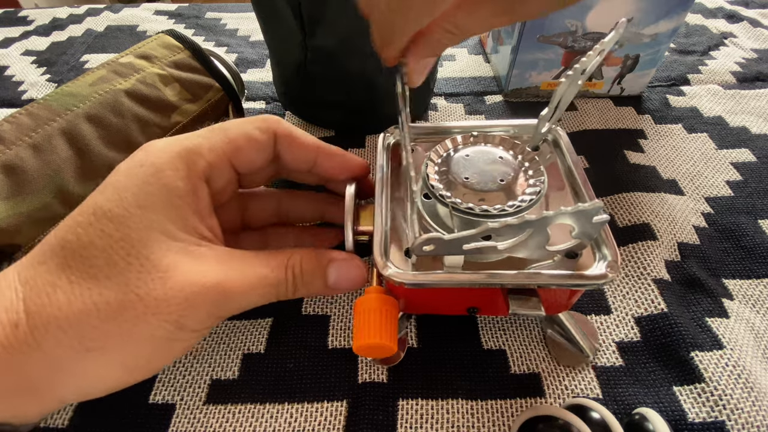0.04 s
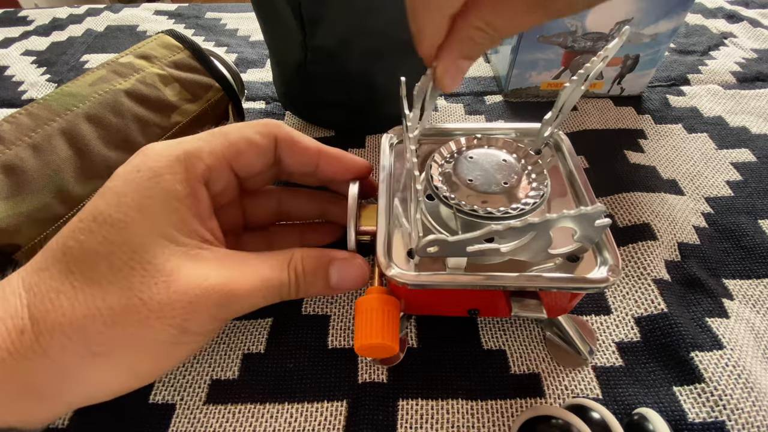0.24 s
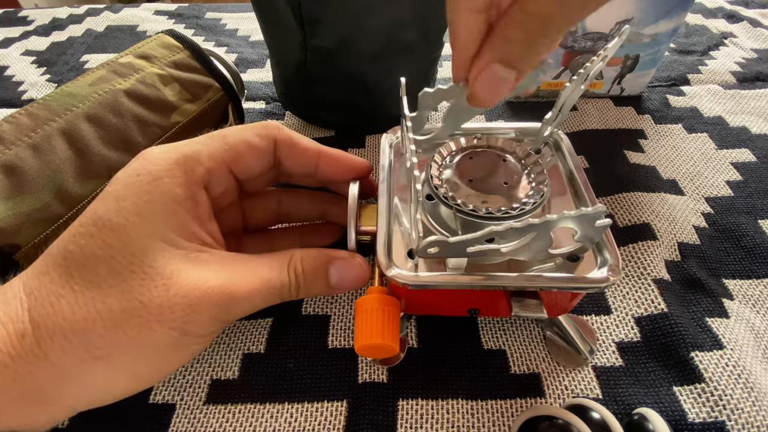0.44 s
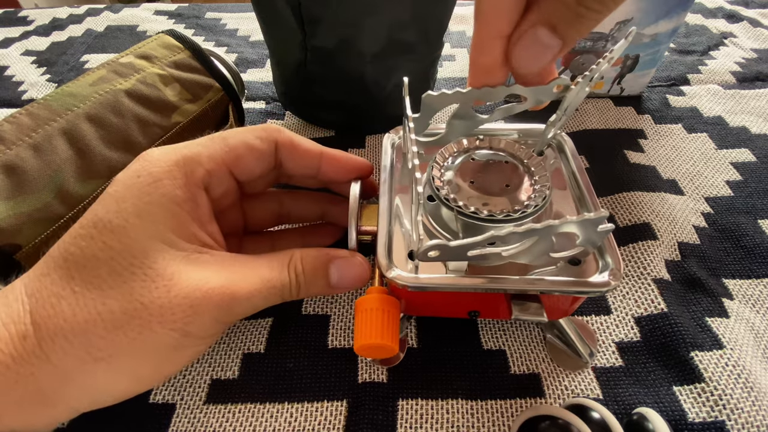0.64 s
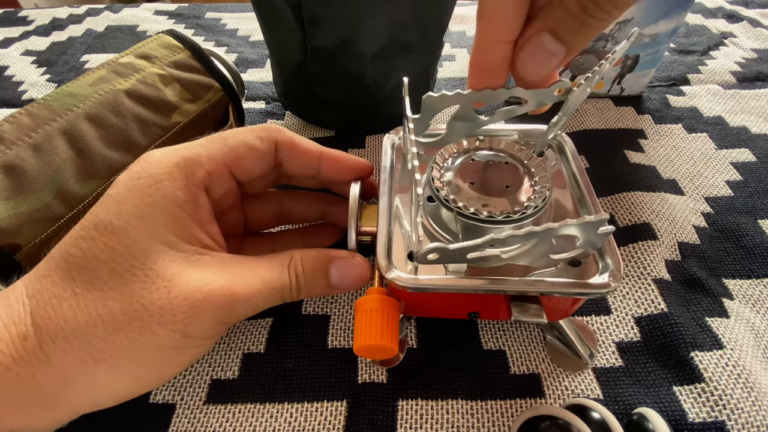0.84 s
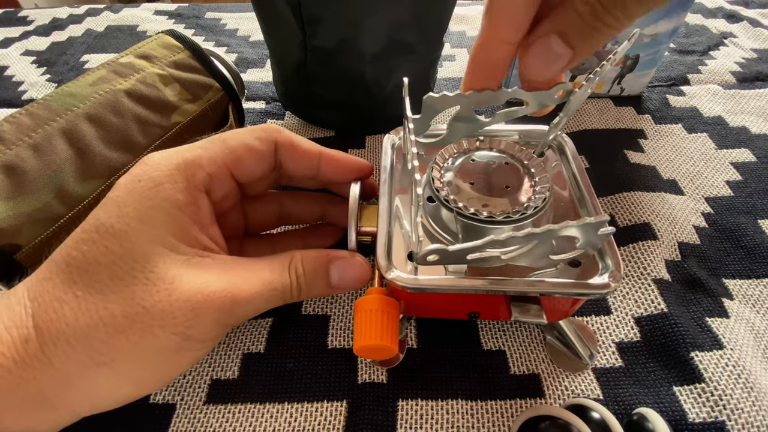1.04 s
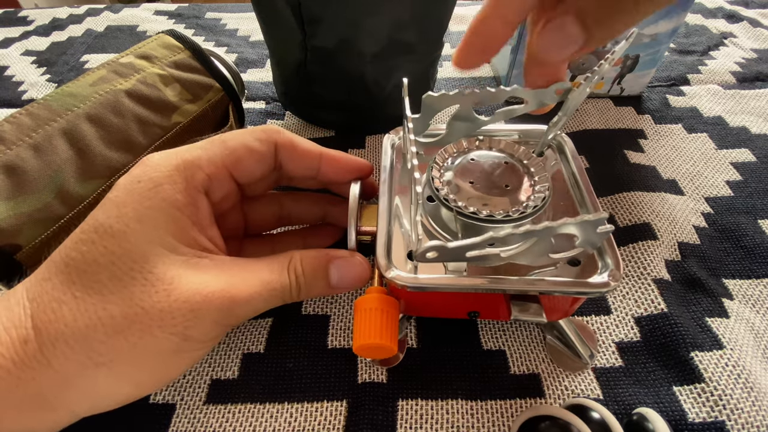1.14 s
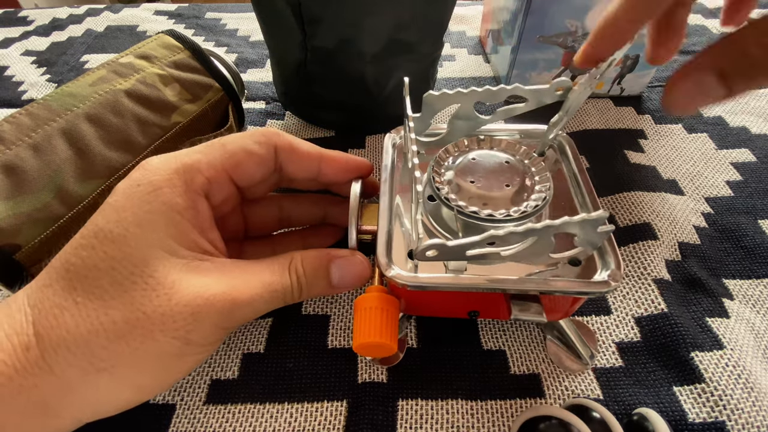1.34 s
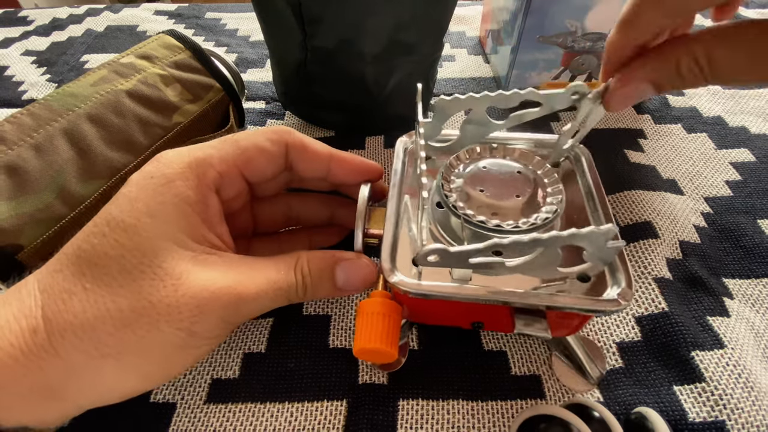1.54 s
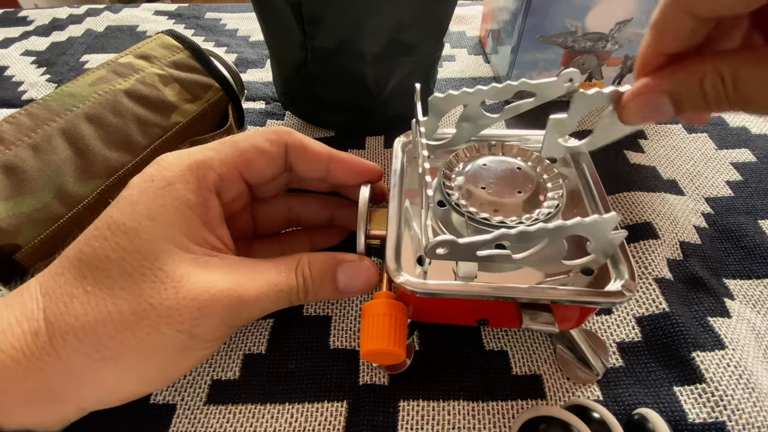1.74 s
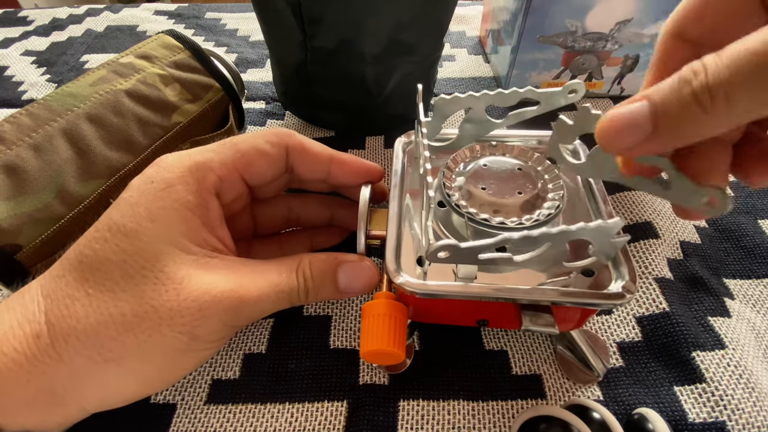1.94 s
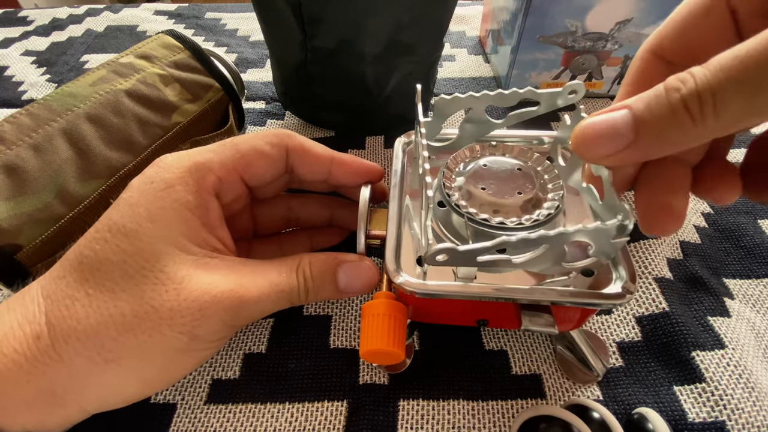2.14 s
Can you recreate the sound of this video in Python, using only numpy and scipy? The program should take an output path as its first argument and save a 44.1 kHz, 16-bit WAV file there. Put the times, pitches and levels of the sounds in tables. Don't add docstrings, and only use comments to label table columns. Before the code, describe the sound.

Thin steel clatter of a small stove's pan supports folded by hand. A faint scrape and chirp open; hard clacks with bouncing clinks strike at 0.21-0.25 and 0.31-0.33 seconds, the hollow tray ringing briefly. A light tick at 0.5, near quiet, then a tick at 1.3, soft scrapes, tiny ticks and squeaks from 1.5, dull knocks near 1.9, and a bright clink at 2.1. Close, indoors, low ventilation rumble.

```python
import sys
import numpy as np
from scipy import signal
from scipy.fft import rfft, irfft, next_fast_len
from scipy.io import wavfile
from scipy.ndimage import uniform_filter1d, map_coordinates

SR = 44100
rng = np.random.default_rng(int(sys.argv[2]) if len(sys.argv) > 2 else 0)


def gain_from_decibels(decibels):
    exponent = np.asarray(decibels, float) / 20
    return 10 ** exponent


def pcm_store(signal):
    levels = np.round(np.clip(np.atleast_2d(signal), -1, 1) * 32767)
    wavfile.write(sys.argv[1], SR, levels.astype(np.int16).T)


N = 97020

# centre in Hz, width in Hz, level in dB.
SOFT_PUSH = [(1363, 916, 0)]


def unit(x):
    return x / np.sqrt(np.mean(x ** 2) + 1e-20)


def along(points, hz):
    f, v = np.transpose(points)
    return np.interp(np.log(hz + 1), np.log(f + 1), v)


def filtered(x, response):
    m = next_fast_len(N + SR)
    return irfft(rfft(x, m) * response(np.fft.rfftfreq(m, 1 / SR)), m)[..., :N]


def scaled(response):
    return lambda f: response(f) / np.abs(irfft(response(f))).max()


def resonance(f, centre, width):
    return 1j * f * width / (centre * centre - f * f + 1j * f * width)


def resonant(peaks, flip=-1):
    def response(f):
        return sum(flip ** k * gain_from_decibels(db) * resonance(f, c, w) for k, (c, w, db) in enumerate(peaks))
    return scaled(response)


def causal(points):
    def response(f):
        cepstrum = irfft(np.log(gain_from_decibels(along(points, f)) + 1e-4))
        cepstrum[1:len(f) - 1] *= 2
        cepstrum[len(f):] = 0
        return np.exp(rfft(cepstrum))
    return scaled(response)


def ringing(modes):
    peaks = []
    for hz, db, t60 in modes:
        t60 = min(t60, 2)
        peaks.append((hz, np.log(1000) / np.pi / t60, db + 20 * np.log10(t60)))
    return resonant(peaks)


def wobble(rate):
    return map_coordinates(rng.standard_normal(N // 100), [np.arange(N) * rate / SR])


def span(t, start, length, edge):
    return np.clip(np.minimum(t - start, start + length + edge - t) / edge, 0, 1)


def contacts():
    # start in seconds, knock on the tray in dB, clink of the arm in dB, crack in dB.
    landings = [(.010, -36, -45, -40.5), (.020, -40, -52, -43.5), (.2148, -12, -9, -11),
                (.2160, -8, -14.5, -40), (.2176, -10.5, -16.5, -26), (.2290, -22, -36, -45),
                (.2445, -19, -9.5, -15), (.2456, -21, -20, -23), (.2470, -12.5, -16.5, -25),
                (.3050, -7, -9.5, -8), (.3064, -13.5, -13.5, -22), (.3084, -8, -12.5, -35),
                (.3105, -11, -13, -35), (.3198, -9.5, -10.5, -10), (.3238, -8, -5.5, -21),
                (.3258, -16, -18, -32), (.3290, -12, -29, -50), (.3385, -31, -39, -50),
                (.3425, -33, -49, -53), (.5057, -37, -32.5, -24), (1.1520, -36.5, -60, -67),
                (1.1575, -32, -60, -72), (1.3034, -31, -35, -29), (1.4300, -43, -52, -55),
                (1.4751, -49, -50, -49), (1.5165, -38.5, -47, -44), (1.5630, -40.5, -62, -68),
                (1.5690, -52, -63, -68), (1.5880, -44, -56, -55), (1.5940, -37.5, -60, -44),
                (1.6140, -50, -49, -41), (1.6185, -40, -46, -48), (1.6250, -42, -49, -48),
                (1.6450, -41, -48, -42), (1.6490, -36.5, -45, -48), (1.6600, -58, -58, -52),
                (1.6680, -42, -56, -50), (1.6770, -43, -55, -50), (1.8610, -34, -44, -57),
                (1.8690, -38, -45, -53), (1.8790, -27, -44, -57), (1.8838, -30, -45, -60),
                (1.8900, -23, -39, -48), (1.9000, -32, -38, -57), (1.9201, -33.5, -38, -62),
                (2.0992, -42, -20, -10), (2.1020, -27.5, -49, -18), (2.1062, -39, -35, -22),
                (2.111, -47, -54, -39)]
    # start in seconds, level in dB of a light tick of a raised arm.
    light_ticks = [
        (.5057, -35),
        (1.3034, -30),
        (1.4282, -49),
        (1.5165, -45),
        (1.5940, -45),
        (1.9200, -51),
    ]
    # centre in Hz, width in Hz, level in dB.
    raised_arm = [(2550, 210, -3), (3730, 250, -25), (4540, 590, -1), (4930, 310, 2.5), (6200, 480, -6.5),
                  (7900, 530, -10), (8500, 280, -7)]
    # Hz, level in dB, t60 in seconds.
    sheet_modes = [(1291, -4, 0.11), (1450, 9.5, 0.29), (1549.3, 7, 0.23), (1667, -19, 0.083),
                   (2600, -4, .2), (2981, 0, .15), (3190, -26, .2), (3370, -25, 0.28), (3700, -16, .4),
                   (4130, -17, .2), (4177, -32, 0.3), (5550, -15, 0.17), (6060, -13, 0.15), (8613, -36, .2)]
    # Hz, level in dB, t60 in seconds.
    last_arm_modes = [(1395, -2.5, 0.24), (1510, 4.5, 0.11), (2144, -14, 0.17), (2377, 2.5, 0.17),
                      (2480, 5.5, 0.24), (2523, -0.5, 0.27), (3100, -13, .3), (3280, -0.5, 0.23),
                      (3510, 3, 0.077), (6160, 0, 0.073), (6250, -6, 0.083), (6640, -6, 0.077),
                      (7601, -14, 0.52), (14900, -2, 0.11)]
    # Hz, level in dB per Hz.
    crack_colour = [(2000, -31.5), (4500, -4.5), (6270, -4), (10000, -3), (11200, -1), (13100, -9.5),
                    (15000, 4.5), (16800, -27)]
    chatter_db, last_arm_s = -23.5, 2.1015

    knock = filtered(blows(landings, -23.5, column=1), resonant(SOFT_PUSH))
    clink = blows(landings, chatter_db, column=2)
    crack = blows(landings, -7, column=3)
    ring = gain_from_decibels(-34) * filtered(0.2 * knock + clink, ringing(sheet_modes))
    hum_mode = (1449, 0, 1.3)
    hum = gain_from_decibels(-55 + 2.5 * wobble(25.7)) * filtered(knock, ringing([hum_mode]))
    wash = shimmer(gain_from_decibels(-24) * clink + blows([(last_arm_s, -32)], -26, column=1))
    last = filtered(blows([(last_arm_s, -27.5)], -31, column=1), ringing(last_arm_modes))
    tick = blows(light_ticks, chatter_db + 10, column=1)
    ticks = filtered(tick, resonant(raised_arm)) + shimmer(gain_from_decibels(-9) * tick)
    flutter = gain_from_decibels(5 * wobble(90))
    struck = tray(0.14 * knock) + arms(clink) + filtered(0.4 * crack, causal(crack_colour))
    return struck + flutter * (ring + last) + ticks + hum + wash


def blows(rows, chatter_db, column):
    decay_s, rise_s = 0.0028, 0.00081
    force, t = np.zeros(N + SR), np.arange(SR // 20) / SR
    envelope = np.exp(-t / decay_s) * (1 - np.exp(-t / rise_s))
    for row, noise in zip(rows, rng.standard_normal((len(rows), len(t)))):
        rattle = gain_from_decibels(chatter_db) * noise * np.abs(noise) * envelope
        start = round(row[0] * SR)
        force[start:][:len(t)] += gain_from_decibels(row[column]) * rattle
        force[start] += gain_from_decibels(row[column])
    return force[:N]


def tray(force):
    # centre in Hz, width in Hz, level in dB.
    cavity = [(1270, 100, -1), (1382, 95, 6), (1464, 71, 12), (1890, 180, -29)]
    # centre in Hz, width in Hz, level in dB.
    hinge_side = [(900, 83, -6), (1102, 120, 8), (1204, 81, 7.5), (1482, 180, -39)]
    t = np.arange(N) / SR
    far = (t > 1.72) & (t < 1.906)
    near_answer = filtered(force * ~far, resonant(cavity, flip=1))
    return near_answer + filtered(force * far, resonant(hinge_side, flip=1))


def arms(force):
    # centre in Hz, width in Hz, level in dB.
    arm_modes = [(2240, 420, -9), (2600, 97, -4), (3024, 140, -3.5), (3640, 133, -6), (4100, 166, -7),
                 (4620, 170, -9.5), (5090, 100, -16.5), (5624, 91, -9), (5950, 110, -5.5), (6290, 75, -4),
                 (7380, 200, -14.5), (8680, 81, -13)]
    # from seconds, centre in Hz, width in Hz, lift in dB.
    favoured = [
        (0, 3050, 497, 9),
        (.24, 5940, 300, -1),
        (.30, 3230, 900, 3),
        (.3225, 4060, 302, 7),
        (.3255, 5950, 300, 14),
        (.4, 3140, 600, -2),
        (1.64, 2580, 300, 9),
        (1.8, 3130, 500, 5),
        (1.91, 2550, 300, 7),
        (2.0, 2450, 296, 8.5),
    ]
    t = np.arange(N) / SR
    ends = [row[0] for row in favoured[1:]] + [N / SR]

    def lift(centre, width, db):
        return lambda f: 1 + gain_from_decibels(db) * resonance(f, centre, width)

    struck = 0
    for (start, centre, width, db), end in zip(favoured, ends):
        struck = struck + filtered(force * (t >= start) * (t < end), lift(centre, width, db))
    return filtered(0.63 * struck, resonant(arm_modes))


def shimmer(force):
    # Hz, level in dB per Hz.
    wash_colour = [(900, -33), (1500, -3.5), (2200, 5.5), (3500, -4), (6000, -6), (9000, -22.5),
                   (16000, -16.5)]
    t60_s = 0.17
    t = np.arange(SR // 2) / SR
    tail = rng.standard_normal(len(t)) * gain_from_decibels(-60 * t / t60_s)
    wash = signal.fftconvolve(force, 3 * tail / np.linalg.norm(tail))[:N]
    return filtered(wash, causal(wash_colour))


def hinges():
    # start in seconds, length in seconds, low rub in dB, bright rub in dB.
    strokes = [(-.03, 0.07, -47, -53), (0.32, 0.016, -27.5, -51), (0.497, 0.021, -51, -46.5),
               (0.854, 0.071, -59, -91), (1.131, 0.089, -59.5, -66.5), (1.3, 0.026, -62, -53),
               (1.376, 0.068, -57.5, -55), (1.48, 0.087, -53.5, -62.5), (1.578, 0.092, -50.5, -52),
               (1.723, 0.1, -51, -64.5), (1.824, 0.023, -46.5, -59), (1.853, 0.044, -39.5, -55.5),
               (1.894, 0.031, -42.5, -55)]
    # Hz, level in dB per Hz.
    rub_colour = [(1060, -17.5), (1800, -9), (11500, -24.5), (13000, -29), (13800, -27), (15900, -20),
                  (16500, -55)]
    slips_per_s, spread_db, edge_s = 1800, 2, 0.019
    t, draw = np.arange(N) / SR, rng.random((3, N))
    clumps = gain_from_decibels(2.5 * wobble(39))
    happens, sign = draw[0] < slips_per_s / SR, np.sign(draw[1] - .5)
    slips = clumps * happens * sign * gain_from_decibels(-spread_db * np.log(draw[2] + 0.018))
    shape = [span(t, start, length, edge_s) for start, length, *_ in strokes]
    low, bright = gain_from_decibels(np.array(strokes)[:, 2:]).T @ shape
    fine = slips + 0.26 * clumps * rng.standard_normal(N)
    low_rub = low * unit(tray(filtered(slips, resonant(SOFT_PUSH))))
    return low_rub + bright * unit(filtered(fine, causal(rub_colour)))


def squeaks():
    # start in seconds, length in seconds, pitch in Hz, level in dB.
    tones = [
        (.008, 0.0037, 3130, -42),
        (0.015, 0.016, 3122, -46),
        (1.612, 0.017, 3145, -52.5),
        (1.648, 0.04, 2566, -54.5),
        (1.865, 0.03, 3117, -52),
        (1.911, 0.017, 2550, -49.5),
    ]
    t = np.arange(N) / SR
    waver = 1 + .008 * unit(uniform_filter1d(rng.standard_normal(N), size=200))
    turns = np.cumsum(waver) / SR
    flutter = gain_from_decibels(4 * wobble(150))
    total = np.zeros(N)
    for start, length, hz, db in tones:
        total += gain_from_decibels(db) * span(t, start, length, .005) * np.sin(2 * np.pi * hz * turns)
    return flutter * total


def room(x):
    # Hz, t60 in seconds.
    decay = [(500, 0.36), (3000, 0.38), (12000, 0.17)]
    gap_s = .008
    hz, t, z = signal.stft(rng.standard_normal((2, SR // 2)), SR, nperseg=256)
    tail = signal.istft(z * gain_from_decibels(-60 * t / along(decay, hz)[:, None]), SR, nperseg=256)[1]
    late = np.pad(x, (round(gap_s * SR), 0))
    return signal.fftconvolve(late[None], tail / np.linalg.norm(tail[0]), axes=1)[:, :N]


def air():
    # Hz, level in dB per Hz.
    rumble = [(22, -60), (40, -2), (140, -6), (178, -14.5), (340, -19.5), (1480, -29.5), (8000, -49.5),
              (12000, -66), (13000, -100)]
    # centre in Hz, width in Hz, level in dB.
    fan = [(65.5, 17, -43), (123, 8.9, -49.5), (235, 23, -54.5)]
    # Hz, likeness of left and right from -1 to 1.
    alike = [(60, 0.91), (180, 0.87), (550, -0.18), (1650, -0.24), (4970, 0.013), (15000, -0.31)]
    # Hz, left over right in dB.
    left_over_right = [(60, -0.5), (380, 3), (2380, 3.5), (15000, 4.5)]
    air_db = -40.5

    def hum(f):
        return sum(gain_from_decibels(db - air_db) * 30 / np.sqrt(w) / np.hypot(1, 2 * (f - c) / w) ** 2
                   for c, w, db in fan)

    def mid_side(f):
        turn = np.arccos(np.clip(along(alike, f), -1, 1)) / 2
        return np.array([np.cos(turn), np.sin(turn)])

    def tilt(f):
        return gain_from_decibels(np.outer([.5, -.5], along(left_over_right, f)))

    noise = rng.standard_normal((2, N))
    wide = unit(filtered(noise, lambda f: gain_from_decibels(along(rumble, f)) * mid_side(f)))
    noise = rng.standard_normal((2, N))
    mid, side = wide + 5 * filtered(noise, lambda f: hum(f) * mid_side(f))
    return gain_from_decibels(air_db - 4.5) * filtered(np.array([mid + side, mid - side]), tilt)


def scene():
    # Hz, left over right in dB.
    balance = [(500, 7.5), (1500, 0.3), (2800, 4), (5500, 6.5), (10000, -4.5), (15000, 1.5)]
    # Hz, radians by which left leads.
    lead = [(500, .3), (1500, .5), (2800, 1.7), (4100, 1), (6000, .9), (9000, 1.5), (15000, 1.5)]
    thin_hz, room_db = 964, -13

    def thin(f):
        return thin_hz ** -2 * -f * f / (1 - (f / thin_hz) ** 2 + 1.2j * f / thin_hz)

    def ports(f):
        halves = [.5, -.5]
        return gain_from_decibels(np.outer(halves, along(balance, f))) * np.exp(1j * np.outer(halves, along(lead, f)))

    stove = filtered(contacts() + hinges() + squeaks(), thin)
    return filtered(stove, ports) + gain_from_decibels(room_db) * room(stove) + air()


def low_pass(x):
    return signal.sosfilt(signal.butter(12, 17000, fs=SR, output="sos"), x)


def record(dry):
    # Hz, level in dB.
    dip = [(11800, 1), (12500, -6), (13600, -12), (14100, -2.5)]
    mix = filtered(dry, lambda f: gain_from_decibels(along(dip, f)))
    return low_pass(mix)


dry = scene()
out = record(dry)
pcm_store(out)
```